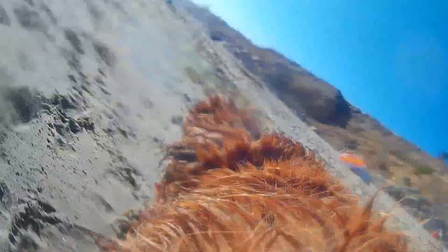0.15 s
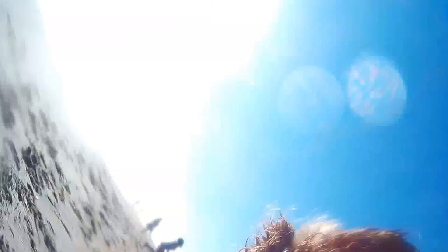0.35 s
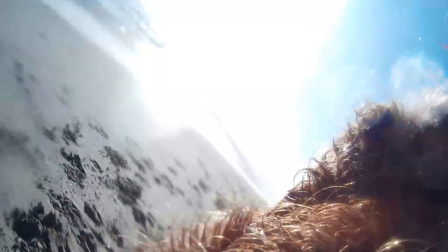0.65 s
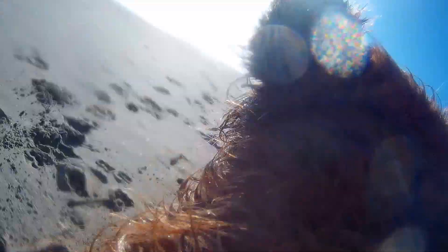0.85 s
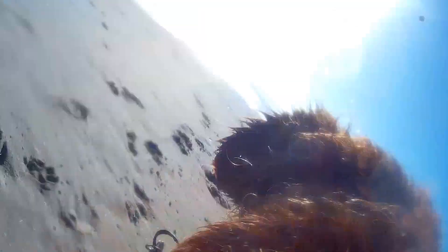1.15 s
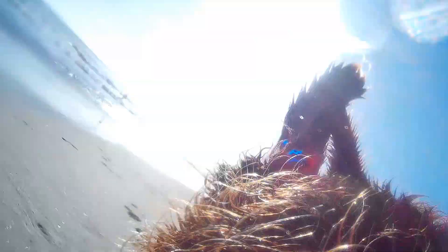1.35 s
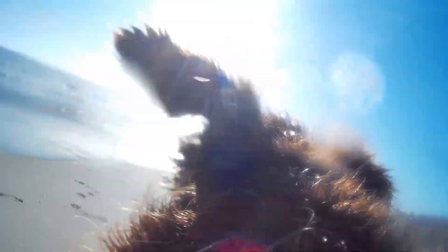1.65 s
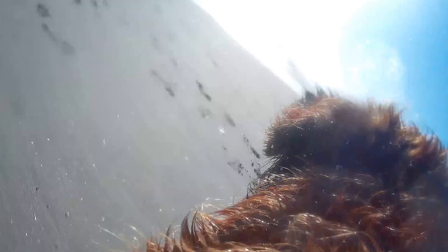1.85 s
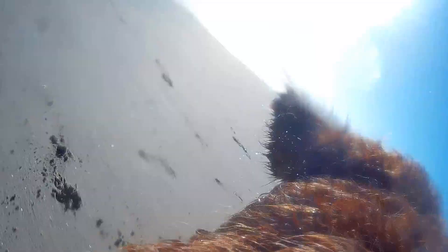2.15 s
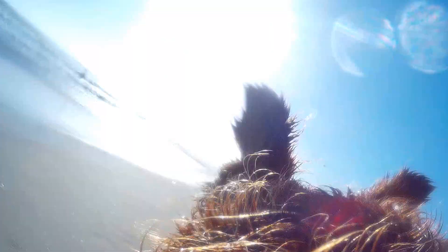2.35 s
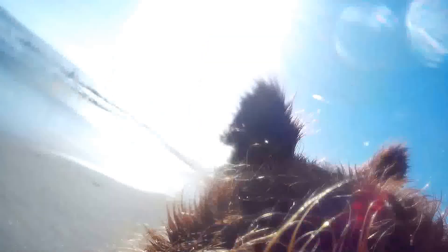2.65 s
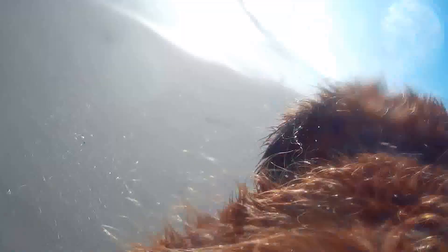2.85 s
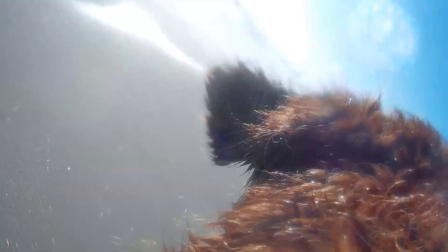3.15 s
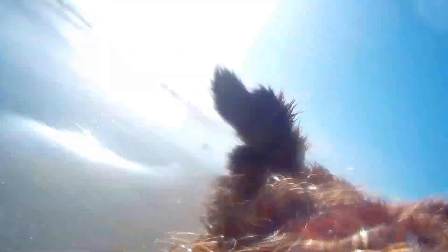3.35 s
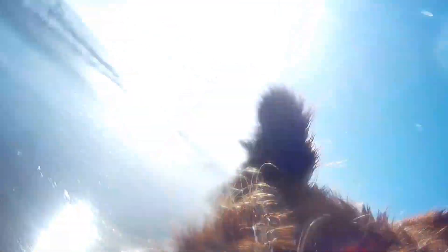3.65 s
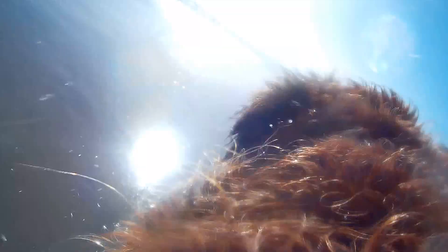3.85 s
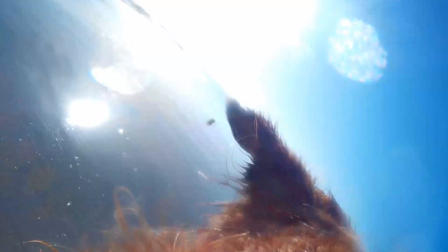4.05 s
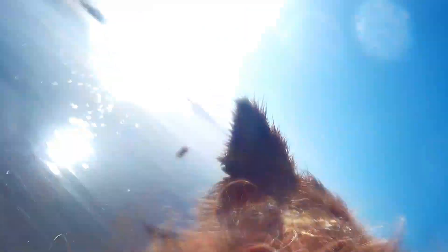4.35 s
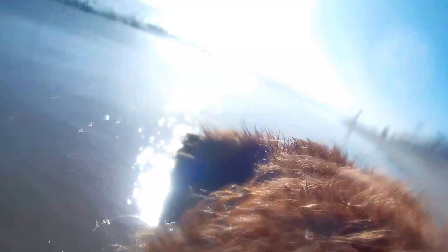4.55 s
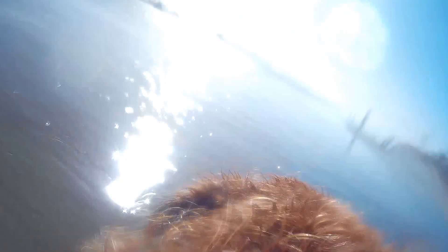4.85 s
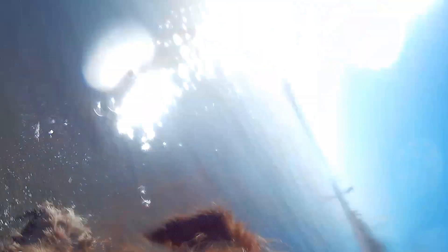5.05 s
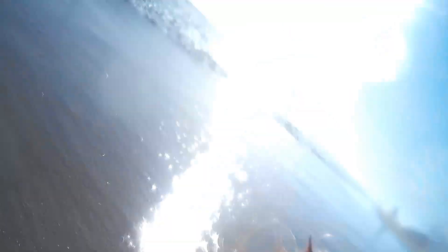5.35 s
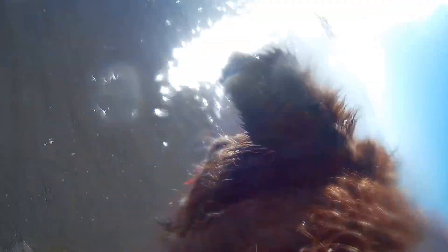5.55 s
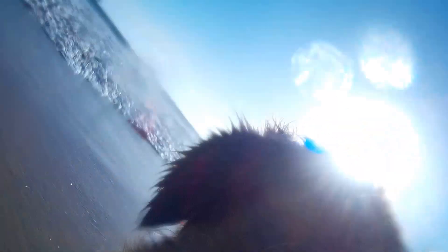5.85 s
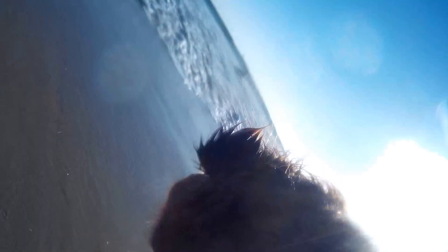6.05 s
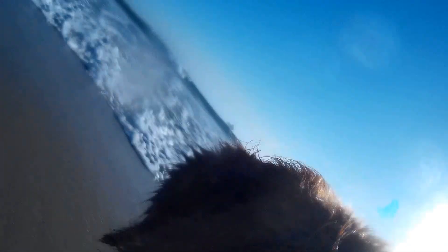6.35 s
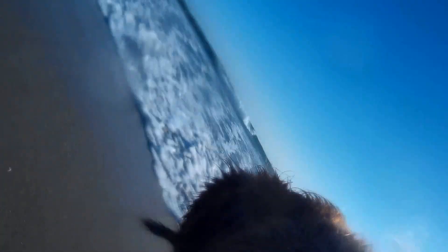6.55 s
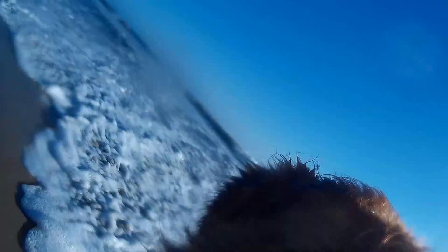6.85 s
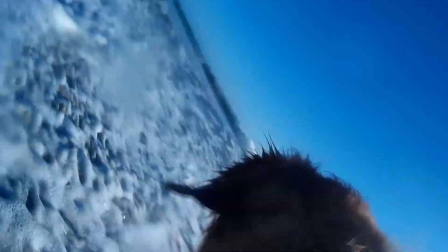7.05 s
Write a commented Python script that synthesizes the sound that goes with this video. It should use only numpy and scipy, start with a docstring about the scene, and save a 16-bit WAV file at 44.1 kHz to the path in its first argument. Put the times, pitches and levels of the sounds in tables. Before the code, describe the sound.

Rapid hollow plastic knocks and thuds from a case jolting on a galloping dog, with buckle ticks, air buffeting and dull surf, slowing near the end.

```python
"""Dog galloping into the surf, heard inside a case on its back

A dog gallops over wet sand towards the surf and slows at the water's edge, a waterproof case strapped to its back.
Strides throw the case against its mount: hollow thuds and clacks of damped modes, loud enough to overload.
Gallop slams bring a rebound and a push-off, rattles a graze; braking steps crack and come slower. A buckle ticks.
Fur and straps rustle as scraped noise; filtered noise makes the air buffeting the case and the dull surf."""
import sys
import numpy as np
from scipy import signal
from scipy.fft import rfft, irfft
from scipy.io import wavfile
from scipy.ndimage import uniform_filter1d, map_coordinates

SR = 44100
rng = np.random.default_rng(int(sys.argv[2]) if len(sys.argv) > 2 else 0)


def waveform_to_disk(signal):
    """Save audio, clipped to [-1, 1], as 16-bit WAV at the path in sys.argv[1]."""
    frames = np.transpose(np.atleast_2d(signal))
    scaled = np.clip(frames, -1, 1) * 32767
    samples = np.round(scaled).astype(np.int16)
    wavfile.write(sys.argv[1], SR, samples)


N = 317520

# Case hitting its mount. Each row: time in seconds, relative strength in dB, thud pitch in Hz, contact kind.
CASE_KNOCKS = [(0.2026, -5, 280, "slam"), (0.2394, -9.5, 382, "crack"), (0.298, -12.5, 420, "nudge"),
               (0.333, -11.5, 395, "grind"), (0.5147, -5, 440, "slam"), (0.5729, -9.5, 420, "rattle"),
               (0.6145, -11, 480, "bump"), (0.6563, -15.5, 373, "bump"), (0.6873, -5, 362, "grind"),
               (0.8268, -6.5, 420, "slam"), (0.8905, -1, 375, "tap"), (0.9485, -5, 270, "bump"),
               (0.986, -24, 356, "drag"), (1.012, -17.5, 320, "drag"), (1.1518, -3.5, 367, "grind"),
               (1.3112, -5, 387, "rattle"), (1.375, -17, 425, "drag"), (1.4689, -4, 404, "slam"),
               (1.499, -16.5, 425, "bump"), (1.536, -15, 310, "grind"), (1.5838, -15.5, 264, "nudge"),
               (1.6266, -4, 330, "rattle"), (1.7156, -9.5, 424, "drag"), (1.822, -1.5, 354, "slam"),
               (1.9585, -14, 480, "tap"), (1.969, -7.5, 402, "grind"), (2.141, -3.5, 323, "slam"),
               (2.2064, -17, 400, "tap"), (2.2602, -16.5, 273, "grind"), (2.2797, -7, 395, "grind"),
               (2.3644, -10, 484, "bump"), (2.4604, -6, 343, "slam"), (2.4856, -14, 413, "bump"),
               (2.5282, -13, 405, "tap"), (2.597, -10, 320, "grind"), (2.612, -6.5, 415, "grind"),
               (2.6877, -15, 363, "drag"), (2.79, -3, 391, "slam"), (2.8532, -12, 394, "tap"),
               (2.9255, -9.5, 394, "rattle"), (3.1122, 1.5, 393, "slam"), (3.2216, -5, 318, "bump"),
               (3.2326, -14, 320, "tap"), (3.4453, 1.5, 354, "slam"), (3.5, -19.5, 382, "tap"),
               (3.5528, -6, 436, "rattle"), (3.7678, -0.5, 376, "slam"), (3.8876, -11.5, 310, "rattle"),
               (4.095, 0.5, 368, "slam"), (4.2072, -13, 434, "tap"), (4.2181, -12.5, 312, "tap"),
               (4.394, -14.5, 340, "grind"), (4.4053, -12, 310, "tap"), (4.423, -12.5, 280, "tap"),
               (4.4597, -0.5, 474, "crack"), (4.5208, -10, 350, "grind"), (4.7154, 6.5, 435, "crack"),
               (4.737, -11, 360, "bump"), (4.7894, -10, 353, "crack"), (4.8551, -5, 463, "rattle"),
               (4.9795, -21, 304, "bump"), (5.0656, -4, 332, "crack"), (5.087, 4.5, 523, "crack"),
               (5.1038, -13.5, 320, "bump"), (5.123, -17.5, 390, "crack"), (5.14, -9, 396, "bump"),
               (5.1769, -18, 408, "nudge"), (5.252, -14.5, 257, "nudge"), (5.4741, -11, 453, "crack"),
               (5.4856, -1.5, 424, "crack"), (5.51, -16.5, 350, "grind"), (5.5374, -19.5, 363, "nudge"),
               (5.627, -30, 320, "nudge"), (5.6752, -24, 357, "grind"), (5.7661, -14.5, 395, "drag"),
               (5.7835, -3.5, 391, "drag"), (5.9284, 3.5, 461, "crack"), (5.998, -30, 397, "bump"),
               (6.0609, -19.5, 390, "nudge"), (6.233, -3, 379, "tap"), (6.3809, -4, 465, "crack"),
               (6.424, -24, 212, "nudge"), (6.7199, -13.5, 497, "bump"), (6.8313, -11.5, 464, "crack"),
               (6.8876, -17, 400, "nudge"), (6.935, -30, 330, "bump"), (7.178, -21.5, 400, "bump")]
# Harness buckle ticks. Each row: time in seconds, relative level in dB, scuff length in ms.
BUCKLE_TICKS = [(0.3627, -15.5, 1.4), (0.3735, -17.5, 1.6), (0.7684, -16.5, 0.8), (1.047, -17, 1.7),
                (1.1472, -6, 1.1), (1.3816, -13.5, 0.46), (1.735, -14, 1.9), (2.0553, -17, 1.7),
                (2.074, -17, 1.4), (2.401, -22, 1.3), (3.0342, -8, 3.3), (3.092, -16, 1.1),
                (3.2867, -15.5, 0.89), (3.358, -14, 0.84), (3.6177, -13.5, 0.59), (3.6912, -19.5, 2.1),
                (3.8566, -18.5, 1.4), (3.933, -17, 0.59), (4.0352, -9.5, 1.5), (4.392, -17.5, 1.1),
                (4.5868, -26, 1.1), (4.7732, -17.5, 1.1), (5.023, -15.5, 2), (5.4148, -9.5, 0.55),
                (5.6744, -17, 0.37), (5.7005, -16.5, 1.1), (6.5879, -16.5, 2.2), (6.6713, -21.5, 1.6),
                (7.1771, -19, 0.87)]
# Plastic buckle modes. Each row: nominal frequency in Hz, relative level in dB, longest t60 in seconds.
BUCKLE_MODES = [(1200, -15, .008), (1950, -4, .014), (2350, -2, .012), (2750, -2, .014), (3150, -6, .01),
                (3700, -8, .012), (4600, -13, .012), (5700, -17, .008), (7000, -16, .008),
                (11000, -32, .005)]
LEAD_S = .01   # room for a contact to swell before its main touch
BURST_SAMPLES = 2600


def from_db(db):
    """Decibels to gain."""
    return 10 ** (np.asarray(db) / 20)


def rms_one(x):
    """Scale to unit power."""
    return x / np.sqrt(np.mean(x ** 2) + 1e-20)


def punch_one(x):
    """Scale a short sound to the energy of 4 ms at rms 1."""
    return x / np.sqrt(np.sum(x ** 2) / (.004 * SR) + 1e-20)


def add(track, start_s, sound):
    """Mix a short sound into the track."""
    start = int(np.clip(round(start_s * SR), 0, N - 1))
    track[start:start + len(sound)] += sound[:N - start]


def coloured(x, spectrum):
    """Shape noise by a spectrum interpolated over log frequency, rolled off beyond its ends; rms 1."""
    hz, db = np.transpose(spectrum)
    bins_hz = np.arange(N // 2 + 1) * SR / N + 1e-3
    gain = from_db(np.interp(np.log(bins_hz), np.log(hz), db))
    gain = gain * np.minimum(bins_hz / hz[0], 1) ** 2
    gain = gain * np.minimum(hz[-1] / bins_hz, 1) ** 2
    return rms_one(irfft(rfft(x) * gain, N))


def drift(points_per_s):
    """Random points joined by straight lines; rms 1."""
    points = rng.standard_normal(4096)
    position = np.arange(N) / SR * points_per_s
    return rms_one(map_coordinates(points, [position], order=1, mode="wrap"))


def resonant_noise(peaks):
    """Noise through doubled two-pole resonances; rows give Hz, section width in Hz, rms dB."""
    out = 0
    for hz, width_hz, db in peaks:
        r = np.exp(-np.pi * width_hz / SR)
        section = [1, 0, -1, 1, -2 * r * np.cos(2 * np.pi * hz / SR), r * r]
        band = signal.sosfilt([section, section], rng.standard_normal(N))
        out = out + from_db(db) * rms_one(band)
    return out


def ringing(hz, db, t60_s, size=BURST_SAMPLES):
    """Damped sines set off by one blow."""
    t = np.arange(size)[:, None] / SR
    modes = from_db(db - 60 * t / t60_s) * np.sin(2 * np.pi * hz * t)
    return modes.sum(axis=1)


def scrape(length_ms, bite):
    """Sandy surfaces grind: uneven grains swell into contact, faster with bite, and fade as the parts separate."""
    phase = (np.arange(BURST_SAMPLES) / SR - LEAD_S) * 1000 / length_ms
    unevenness = np.exp(.8 * rng.standard_normal(BURST_SAMPLES))
    grains = rng.standard_normal(BURST_SAMPLES) * unevenness
    return grains * np.exp(np.minimum(bite * phase, -phase) - (phase / 4) ** 2)


def grit(t60_s):
    """Loose sand keeps crackling after a blow: sparse-peaked noise, decaying."""
    age_s = np.arange(BURST_SAMPLES) / SR - LEAD_S
    grains = rng.standard_normal(BURST_SAMPLES) ** 3
    return grains * (age_s > 0) * from_db(-60 * np.abs(age_s) / t60_s)


def gritty_scrape(length_ms, bite, grit_db, grit_t60_s):
    """Contact force of a scrape followed by crackling sand."""
    return punch_one(scrape(length_ms, bite)) + from_db(grit_db) * punch_one(grit(grit_t60_s))


def bounces(chatter_ms, rebound, count=5):
    """A first touch, then weaker uneven rebounds over about twice the chatter time."""
    force, first = np.zeros(BURST_SAMPLES), round(LEAD_S * SR)
    order = (np.arange(count) + rng.random(count)) / count
    lags = np.clip(order * 2 * chatter_ms * SR / 1000, 1, BURST_SAMPLES // 2).astype(int)
    looseness = chatter_ms / (chatter_ms + 2)
    signs = rng.choice([-1, 1], count)
    force[first + lags] = rebound * looseness * np.exp(-order) * signs
    force[first] = 1
    return force


def thud(pitch_hz, chatter_ms, t60_s=0.021, sway_hz=210, sway_db=-5, sway_t60_s=0.017, soft_hz=800, low_hz=160):
    """The whole case rings on its mount and sways on the dog's back."""
    sway = ringing(sway_hz * rng.uniform(0.84, 1.4), sway_db, sway_t60_s)
    ring = ringing(pitch_hz, 0, t60_s) + sway
    struck = signal.fftconvolve(bounces(chatter_ms, rebound=1.175), ring)
    struck = signal.lfilter(*signal.butter(1, low_hz, "high", fs=SR), struck)
    return punch_one(signal.lfilter(*signal.butter(2, soft_hz, fs=SR), struck))


def clack(modes, hardness_db_per_octave, force, ring_cycles=26):
    """A force rings a plastic part; harder contacts favour high modes, the grip detunes them a little."""
    hz, mode_db, t60_s = np.transpose(modes)
    hz = hz * (1 + .05 * rng.standard_normal(len(hz)))
    damped_s = np.minimum(t60_s, ring_cycles / hz)   # lossy plastic: t60 limited to a number of cycles
    mode_db = mode_db + 10 * np.log10(t60_s / damped_s)   # keeps the energy of a shortened mode
    mode_db = mode_db + hardness_db_per_octave * np.log2(hz / 800)
    return punch_one(signal.fftconvolve(force, ringing(hz, mode_db, damped_s)))


def wash(effort_db, level_db=-47):
    """Surf and rushing air through the shell: coloured noise plus the case's air resonances, flickering."""
    # Each row: frequency in Hz, relative density in dB per Hz.
    wash_colour = [(150, 7), (250, 5), (380, 2), (520, -2), (720, -10), (1000, -9), (1400, -16),
                   (2200, -15), (3000, -24), (5500, -32), (7000, -30), (10000, -39)]
    # Air inside the case. Each row: frequency in Hz, section width in Hz, relative level in dB.
    cavity = [(1180, 170, -8), (1520, 90, -20), (1900, 240, -12), (2350, 240, -17), (3600, 380, -23),
              (4570, 240, -27)]
    rush = coloured(rng.standard_normal(N), wash_colour) + resonant_noise(cavity)
    return from_db(effort_db + level_db + 2 * drift(22)) * rush


def buffet(effort_db, level_db=-31.0, follows=1.93, lurch_db=-21, lurch_s=0.019,
           leap_db=-29, leap_lead_s=0.077, leap_width_s=0.023):
    """Slow air pressure swings: steep with pace, surging in the leap before each slam and around knocks."""
    # Each row: frequency in Hz, relative density in dB per Hz.
    buffet_colour = [(14, 2.5), (25, -2.5), (36, -7.5), (55, -9), (85, -15), (140, -25), (300, -47),
                     (600, -52.5)]
    t = np.arange(N) / SR
    lurches = sum(from_db(db) * np.exp(-np.abs(t - s) / lurch_s) for s, db, *_ in CASE_KNOCKS)
    leaps = sum(np.exp(-((t - s + leap_lead_s) / leap_width_s) ** 2)
                for s, *_, kind in CASE_KNOCKS if kind == "slam")
    surges = from_db(lurch_db) * lurches + from_db(leap_db) * leaps
    push = from_db(level_db + follows * effort_db) + from_db(effort_db) * surges
    swings = coloured(rng.standard_normal(N), buffet_colour)
    local_power = uniform_filter1d(swings ** 2, size=6000)
    return push * swings / np.sqrt(local_power + 1e-3)   # evened out, so that push sets the level


def rustle(effort_db, level_db=-34, scuff_ms=5, thinning=2.0, slide_db=-25, slide_ms=11, count=35,
           slip_db=-45, slip_ms=14, slip_lead_s=.035):
    """Scrapes: straps slide at ticks, the case slips on fur, fur scuffs at random, less when slow."""
    out = np.zeros(N)
    for s, db, _ in BUCKLE_TICKS:
        slide = clack(BUCKLE_MODES, -3.5, scrape(slide_ms, bite=0.43))
        add(out, s - LEAD_S, from_db(db + slide_db) * slide)
    for s, *_, kind in CASE_KNOCKS:
        if kind in ("rattle", "grind", "tap"):   # slips just before a loose landing
            slip = clack(BUCKLE_MODES, -11, scrape(slip_ms, bite=1.6))
            add(out, s - LEAD_S - slip_lead_s, from_db(slip_db) * slip)
    for when, size, stretch, luck in rng.random((count, 4)):
        i = int(when * N)
        if luck < from_db(thinning * effort_db[i]):
            scuff = clack(BUCKLE_MODES, -8.5, scrape(scuff_ms * (.5 + stretch), bite=0.99))
            add(out, i / SR, from_db(level_db + effort_db[i] + 10 * size) * scuff)
    return out


def jostle(effort_db, bump_db=-30, bump_hz=250, count=55):
    """The loose harness makes soft thuds at random, fewer when the dog slows."""
    out = np.zeros(N)
    for when, size, stretch, luck in rng.random((count, 4)):
        i = int(when * N)
        if luck < from_db(effort_db[i]):
            bump = thud(bump_hz * 2 ** (stretch - .5), chatter_ms=2.6)
            add(out, i / SR, from_db(bump_db + effort_db[i] + 10 * (size - .5)) * bump)
    return out


def ticks(level_db=-9, grit_db=-12, grit_t60_s=0.045, wall_hz=7500, low_hz=1300,
          jerk_lead_s=.003, jerk_db=-15.5, jerk_ms=1.5):
    """The plastic buckle scuffs, rings briefly and grates on sand; straps also snatch it before slams."""
    out = np.zeros(N)
    events = [(s, db + level_db, scuff_ms) for s, db, scuff_ms in BUCKLE_TICKS]
    events += [(s - jerk_lead_s, db + jerk_db, jerk_ms) for s, db, _, kind in CASE_KNOCKS if kind == "slam"]
    for s, db, scuff_ms in events:
        force = gritty_scrape(scuff_ms, 3.7, grit_db, grit_t60_s)
        add(out, s - LEAD_S, from_db(db) * clack(BUCKLE_MODES, 0, force))
    out = signal.lfilter(*signal.butter(2, low_hz, "high", fs=SR), out)   # too small to radiate bass
    case_wall = signal.butter(3, wall_hz, fs=SR, output="sos")
    return signal.sosfilt(case_wall, out)


def blows(rebound_s=0.051, rebound_db=-24, push_off_s=.224, push_off_db=-22, graze_lead_s=0.018, graze_db=-7):
    """All knocks plus a rebound and push-off after each slam and a graze before each rattle."""
    out = list(CASE_KNOCKS)
    for s, db, hz, kind in CASE_KNOCKS:
        if kind == "slam":
            out.append((s + rebound_s, db + rebound_db, hz, "bump"))
            out.append((s + push_off_s, db + push_off_db, hz, "drag"))
        if kind == "rattle":
            out.append((s - graze_lead_s, db + graze_db, hz, "drag"))
    return out


def knocks(hum_hz=608, hum_db=-44, hum_db_per_ms=1.5, hum_t60_s=0.31, grit_db=-21, grit_t60_s=0.053):
    """Thud of the case and clack of its shell; a lightly damped mount mode hums on, more after long contacts."""
    # Shell modes. Each row: nominal frequency in Hz, relative level in dB, longest t60 in seconds.
    shell_modes = [(570, -8.5, 0.0094), (836.4, 10, 0.008), (1144, 5.5, 0.015), (1446, -9, 0.019),
                   (1858, 0.5, 0.014), (2297, -2, 0.0092), (3120, -47.5, 0.01), (3447, -30, 0.036),
                   (4550, -60, 0.036), (6670, -38, 0.072), (9800, -63, .005)]
    # By contact kind: clack over thud in dB, hardness in dB per octave, chatter scale in ms.
    # Slam: full weight; crack: hard, braking; grind: sandy slide; rattle: loose landing;
    # tap: crisp rebound; bump: short, dull; drag: soft, smeared; nudge: muffled by fur.
    contacts = {"slam": (5.1, -9.5, 1.89), "crack": (-2.07, 1.4, 2.013), "grind": (0, -5.5, 4.98),
                "rattle": (-1, -4.5, 5.3), "tap": (0, -12, 0.83), "bump": (-11, 1.5, 1),
                "drag": (-11.5, 1, 4.76), "nudge": (-29.5, 8.1, 2.93)}
    out = np.zeros(N)
    for s, db, pitch_hz, kind in blows():
        clack_db, hardness, chatter_ms = contacts[kind]
        force = gritty_scrape(chatter_ms, 3.2, grit_db, grit_t60_s)
        shell = clack(shell_modes, hardness, force)
        body = thud(pitch_hz, chatter_ms)
        add(out, s - LEAD_S, from_db(db) * (body + from_db(clack_db) * shell))
        hum = ringing(hum_hz, hum_db, hum_t60_s, size=16000)
        add(out, s, from_db(min(db, 0) + hum_db_per_ms * chatter_ms) * hum)
    return out


def scene():
    """Everything reaches one microphone inside the case; the open beach adds no echo."""
    # The dog's pace. Each row: time in seconds, effort in dB (0 at full gallop).
    effort = [(0, -1), (.25, -0.5), (1.5, -3), (3, -1.5), (4.2, -3.5), (5.4, -2.5), (5.8, -8), (6.5, -7.5),
              (7.2, -9)]
    effort_db = np.interp(np.arange(N) / SR, *np.transpose(effort))
    impacts = knocks() + ticks() + jostle(effort_db)
    return (impacts + rustle(effort_db) + wash(effort_db) + buffet(effort_db))[None]


def record(dry, hiss_db=-70, overload=.69, stop_hz=17000):
    """Faint hiss and electronic whine, hard overload on the big knocks, then the top is cut."""
    # Each row: frequency in Hz, section width in Hz, rms level in dB.
    whine = [(9535, 14, -78), (14450, 150, -81)]
    x = dry + resonant_noise(whine) + from_db(hiss_db) * rng.standard_normal(N)
    clipped = x / (1 + (x / overload) ** 12) ** (1 / 12)
    return signal.sosfilt(signal.cheby2(14, 70, stop_hz, fs=SR, output="sos"), clipped)


dry = scene()
out = record(dry)
waveform_to_disk(out)
```